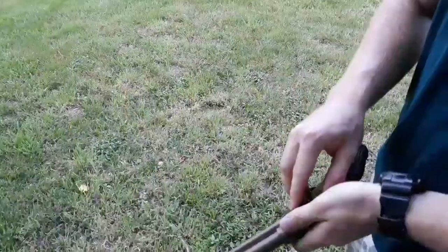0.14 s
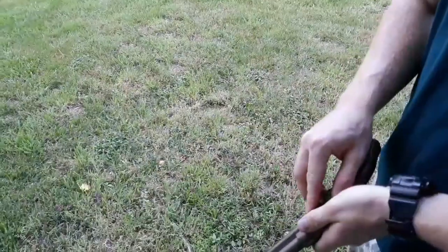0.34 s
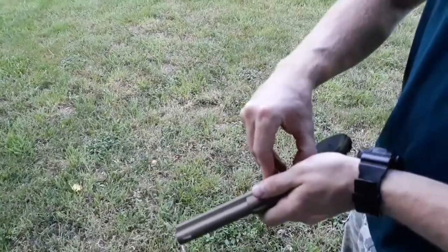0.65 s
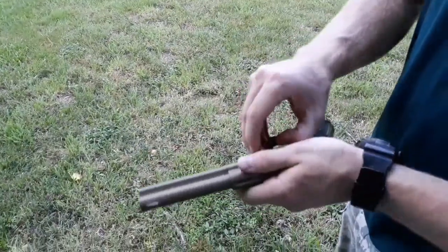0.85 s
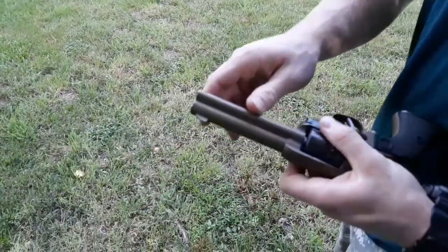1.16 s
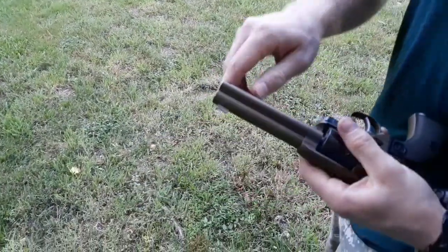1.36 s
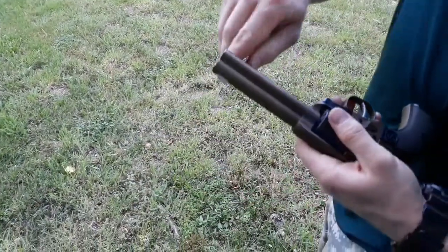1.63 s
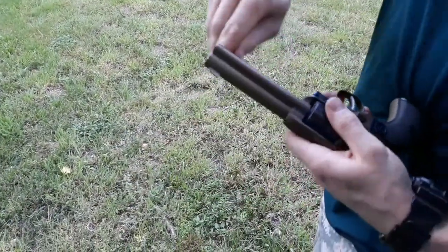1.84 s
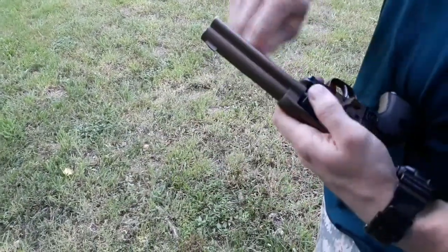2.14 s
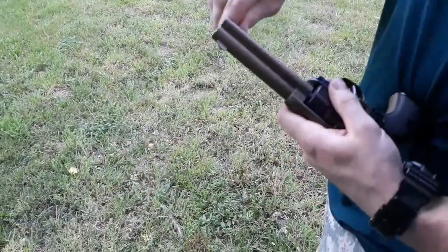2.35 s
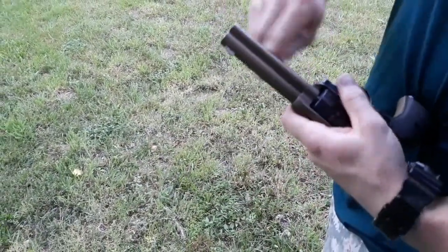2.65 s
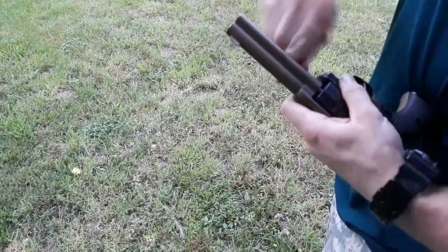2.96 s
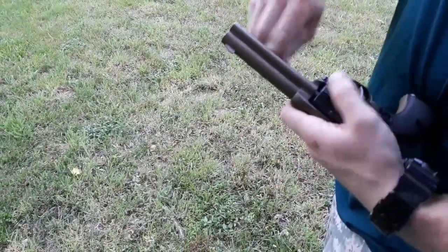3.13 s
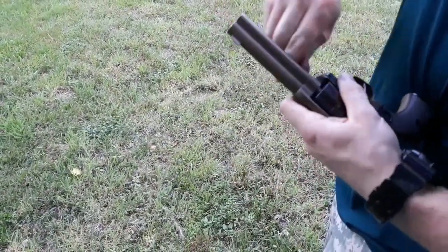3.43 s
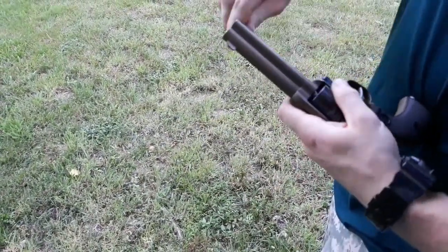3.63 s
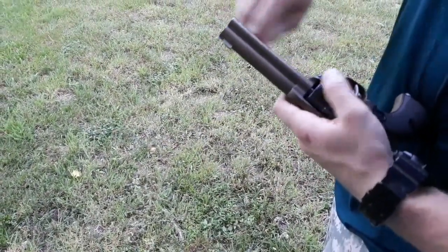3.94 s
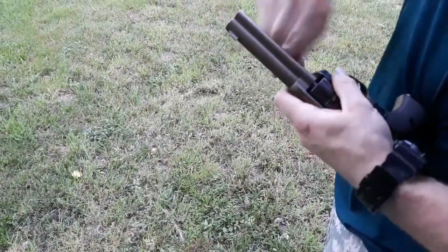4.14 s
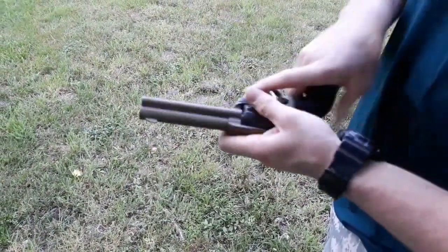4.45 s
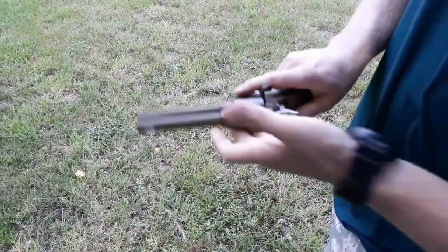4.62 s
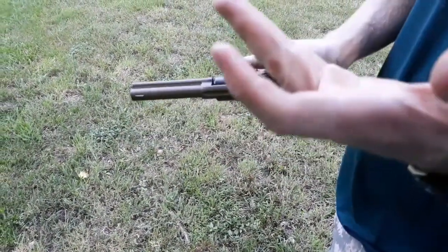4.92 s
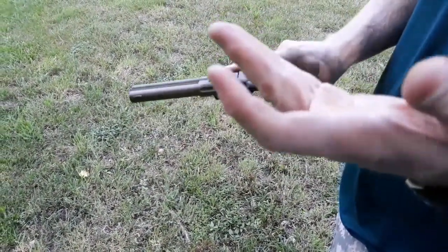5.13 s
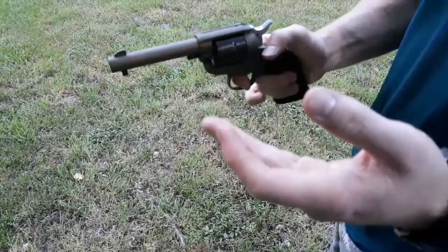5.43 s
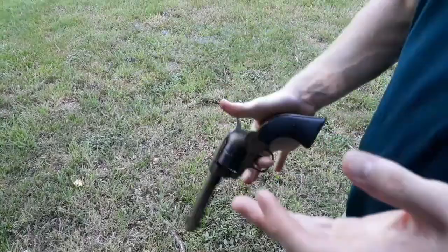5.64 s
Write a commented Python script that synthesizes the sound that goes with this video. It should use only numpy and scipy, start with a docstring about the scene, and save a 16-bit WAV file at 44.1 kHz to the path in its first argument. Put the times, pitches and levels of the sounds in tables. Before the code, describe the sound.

Outdoors on a lawn, a close stereo microphone catches a revolver being handled. A gate clicks open, a small ringing knock follows, then a spring-loaded rod repeatedly scrapes, squeaks and snaps back. Light cylinder taps lead to a hard closing snap, then faint touches. A bird whistles now and then over leafy hiss and low rumble.

```python
"""A steel revolver is emptied by hand on a lawn, close to a small two-port microphone: impulses and
friction grains excite damped steel modes as the sprung ejector rod scrapes and snaps home; gate,
cylinder and cases click in modes of their own, and the spring squeaks as gliding narrow-band noise.
A songbird whistles in the trees (gliding sine) over hiss and rumble (coloured noise), faint even ticks
(struck resonance), dull thuds (damped swings) and a wooden clatter further off (resonant noise)."""
import sys
import numpy as np
from scipy import signal
from scipy.fft import rfft, irfft, next_fast_len
from scipy.io import wavfile
from scipy.ndimage import uniform_filter1d, minimum_filter1d

SR = 44100
rng = np.random.default_rng(int(sys.argv[2]) if len(sys.argv) > 2 else 0)


def level_to_linear(level):
    """Convert decibel levels to linear amplitude factors, elementwise."""
    exponent = np.asarray(level, float) / 20
    return 10 ** exponent


def transcribe(u):
    """Save the signal u as a 16-bit wav file named by the first command-line argument.

    u: samples, shape (n,) or (channels, n), limited to [-1, 1]; the rate is SR.
    q: integer samples, one column per channel.
    """
    v = np.clip(np.atleast_2d(u).T, -1, 1)
    q = np.round(v * 32767).astype(np.int16)
    wavfile.write(sys.argv[1], SR, q)


N = 254935  # samples


def rms_one(x):
    """Normalisation: each channel to unit rms."""
    return x / np.sqrt(np.mean(x ** 2, axis=-1, keepdims=True) + 1e-20)


def in_time(tables, column, rest):
    """Linear interpolation of one column of several tables along time, at rest between them."""
    t, out = np.arange(N) / SR, np.full(N, float(rest))
    for rows in map(np.array, tables):
        inside = (t >= rows[0, 0]) & (t <= rows[-1, 0])
        out[inside] = np.interp(t[inside], rows[:, 0], rows[:, column])
    return out


def colour(x, points, share=1):
    """Linear filtering by a magnitude response: (f/Hz, level/dB) points joined on a log axis."""
    size, (hz, db) = next_fast_len(N + 4096), np.transpose(points)
    log_hz = np.log(np.arange(size // 2 + 1) * SR / size + 1)
    response = level_to_linear(share * np.interp(log_hz, np.log(hz), db))
    return irfft(rfft(x, size) * response, size)[..., :N]


def ring(x, hz, t60):
    """Damped resonator: a unit click sets a sine of height 1 ringing."""
    r, w = level_to_linear(-60 / (t60 * SR)), 2 * np.pi * hz / SR
    return signal.lfilter([0, np.sin(w)], [1, -2 * r * np.cos(w), r * r], x + 1e-18)


def drift(rate_hz):
    """Low-passed Gaussian noise: slow chance with spread 1."""
    r = np.exp(-2 * np.pi * rate_hz / SR)
    return rms_one(signal.lfilter([1], [1, -2 * r, r * r], rng.standard_normal(N + SR))[SR:])


def pair(rows, alike):
    """Partial coherence: two channels from three draws, the first shared."""
    alike = np.clip(alike, 0, 1)
    return np.sqrt(alike) * rows[0] + np.sqrt(1 - alike) * rows[1:]


def span(start, stop, attack, release):
    """Envelope: progress 0-1 through a span, and a gain that fades in and decays after the stop."""
    t = np.arange(N) / SR
    fade_in = np.clip((t - start) / attack, 0, 1) ** 2
    decay = np.exp(-np.maximum(t - stop, 0) / release * 2)
    return np.clip((t - start) / (stop - start), 0, 1), fade_in * decay


def highpass(x, hz):
    """Second-order Butterworth high-pass: the bass falls away below hz."""
    return signal.sosfilt(signal.butter(2, hz, "high", fs=SR, output="sos"), x)


# outdoor floor over time, relative levels: [t/s, rumble level/dB, hiss level/dB]
FLOOR_LEVELS = [(0.0, -70.5, -58), (0.58, -67.5, -59.5), (0.64, -62, -56), (0.85, -65, -58.5),
                (1.19, -72, -58), (1.98, -72, -61), (2.46, -70, -57), (3.3, -70.5, -57.5),
                (3.91, -69.5, -54), (4.1, -72.5, -64.5), (4.25, -68, -57), (4.5, -72, -59.5),
                (5.49, -79, -65.5), (5.78, -76, -64)]
# spectral density of the floor at either port: [f/Hz, level/dB per Hz]
LEFT_FLOOR_COLOUR = [(25, -21), (70, 3.5), (145, -2.5), (300, -7.5), (600, -5.5), (1400, -12.5), (2400, -7),
                     (4600, -11), (7200, -11), (8600, -28), (11500, -20.5), (15200, -18.5), (16000, -34.5)]
RIGHT_FLOOR_COLOUR = [(25, -21.5), (70, 1.5), (140, -0.5), (270, -8.5), (620, -9.5), (1500, -10),
                      (2400, 0.5), (3100, -3), (4030, -0.5), (5700, -18.5), (6700, -30.5), (14400, -27),
                      (16000, -31)]


def floor():
    """Coloured noise: partly coherent, lumpy rumble; hiss of leaves and insects, own at each port."""
    def shaped(x, kind, hz):
        """Band splitting: one side of the split, rms 1 in the middle."""
        x = np.array([colour(x[0], LEFT_FLOOR_COLOUR), colour(x[1], RIGHT_FLOOR_COLOUR)])
        x = signal.sosfilt(signal.butter(2, hz, kind, fs=SR, output="sos"), x)
        return x / np.sqrt(np.mean(x.mean(0) ** 2))
    rumble = shaped(pair(rng.standard_normal((3, N)), 0.45), "low", 900)
    hiss = shaped(rng.standard_normal((2, N)), "high", 900)
    rumble_db = in_time([FLOOR_LEVELS], 1, -72.5) + 2.0 + 2.0 * drift(11)
    hiss_db = in_time([FLOOR_LEVELS], 2, -61.5) - 3.5 + 1.0 * drift(24)
    return rumble * level_to_linear(rumble_db) + hiss * level_to_linear(hiss_db)


def ticks():
    """Periodic impulses on one strongly damped resonance: faint high ticks, mostly on the left."""
    start_s, period_s = .074, .1024
    at = (np.arange(start_s, N / SR, period_s) * SR).astype(int)
    clicks = np.zeros(N)
    clicks[at] = level_to_linear(-44.5 + 1.6 * rng.standard_normal(len(at)))
    return ring(clicks, 6970, 0.00038) * level_to_linear([[0], [-14]])  # Hz, t60 in s


# envelope of the clatter: [t/s, level/dB]
CLATTER_LEVELS = [(.105, -57), (.115, -50), (.145, -40.5), (.18, -48.5), (.222, -49), (.23, -71)]
# broad resonances of the clatter: [f/Hz, width/Hz, level/dB]
CLATTER_RESONANCES = [(515, 620, -33), (1008, 150, 9.5), (1375, 430, 6), (2320, 430, 4), (2960, 100, 0.5),
                      (3430, 390, -42)]
# impulse behind its crack: [t/s, level before softening and ringing/dB]
CRACK_IMPULSE = [(0.14, -24)]


def clatter():
    """Resonant filtering: lumpy noise in a few broad, wooden resonances, with one sharp crack."""
    drive = pair(rng.standard_normal((3, N)), 0.64) * level_to_linear(1.0 * drift(80))
    body = 0
    for hz, width, db in CLATTER_RESONANCES:
        t60 = np.log(1000) / np.pi / width  # a wider resonance dies sooner
        body = body + level_to_linear(db) * np.sqrt(width) * ring(drive, hz, t60)
    body = highpass(rms_one(body), 400)
    click = np.zeros(N)
    click[round(CRACK_IMPULSE[0][0] * SR)] = level_to_linear(CRACK_IMPULSE[0][1])
    click = signal.lfilter([.3], [1, -.7], click)  # a soft contact
    crack = 1.75 * ring(click, 2280, 0.0029) + 1.0 * ring(click, 4020, 0.0066)
    return body * level_to_linear(in_time([CLATTER_LEVELS], 1, -120)) + crack * level_to_linear([[-7], [4]])


# dull thuds carried by the ground or the hand:
# [t/s, level before onset and damping/dB, settled f/Hz, t60/s, left-right level/dB]
THUD_SWINGS = [(0.141, -45, 87, 0.13, -27), (4.348, -30, 123.3, 0.021, -33.5),
               (5.113, -27.5, 91, 0.027, 19), (5.183, -40, 500, 0.027, 3), (5.597, -48.5, 63.3, 0.066, 20)]


def thuds():
    """Damped oscillation: a low swing whose pitch sags as the contact spreads."""
    out = np.zeros((2, N))
    for s, db, hz, t60, pan_db in THUD_SWINGS:
        t = np.maximum(np.arange(N) / SR - s, 0)
        cycles = hz * (t + 0.0084 * (1 - np.exp(-t / 0.0016)))
        onset = np.minimum(t / 0.013, 1)
        swing = level_to_linear(db - 60 * t / t60) * np.sin(2 * np.pi * cycles) * onset
        out += swing * level_to_linear([[pan_db / 2], [-pan_db / 2]])
    return highpass(out, 50)


# bird whistles, one table each: [t/s, f/Hz, mean level before flutter/dB]
WHISTLES = [
    [(0.225, 3510, -51), (0.245, 3944, -61), (0.261, 2897, -59), (0.287, 2704, -64), (0.3, 2670, -67)],
    [(0.315, 2760, -60), (0.335, 3154, -47), (0.371, 3004, -51), (0.397, 2784, -61), (0.42, 2488, -61)],
    [(1.135, 4135, -74), (1.149, 3861, -56), (1.162, 3728, -70)],
    [(1.34, 2890, -84), (1.354, 2719, -58), (1.384, 2460, -78), (1.39, 2545, -68)],
    [(1.43, 2140, -61), (1.448, 2800, -60), (1.456, 3420, -54), (1.468, 3564, -50), (1.479, 3630, -51)],
    [(1.481, 3850, -62), (1.487, 4130, -56), (1.492, 4120, -58)],
    [(1.493, 3320, -59), (1.502, 3050, -56), (1.518, 2680, -62)],
    [(2.38, 3000, -72), (2.408, 3075, -57), (2.42, 3460, -56), (2.466, 3360, -71), (2.49, 3350, -49)],
    [(3.53, 2510, -85), (3.55, 2739, -56), (3.572, 3430, -61), (3.582, 3370, -62), (3.62, 3250, -69)],
    [(4.58, 2690, -80.5), (4.616, 2570, -86), (4.654, 3430, -52), (4.688, 2750, -64), (4.72, 3060, -72)],
    [(5.68, 3200, -62.5), (5.696, 3684, -67), (5.716, 4070, -66.5), (5.75, 2970, -71), (5.78, 3307, -76.5)],
]


def bird():
    """Frequency modulation: a near sine follows the gliding pitch, with soft edges."""
    level = level_to_linear(in_time(WHISTLES, 2, -120) + 2.0 * drift(50))
    level = uniform_filter1d(level, size=300)
    phase = 2 * np.pi * np.cumsum(in_time(WHISTLES, 1, 2800)) / SR
    return np.sqrt(2) * level * np.sin(phase)


# modes of the steel parts: [f/Hz, struck level/dB, scraped level/dB, t60/s]
STEEL_MODES = [(994, 1, -32, 0.022), (1480, 11, -20.5, 0.0034), (1884, 5.5, -19.5, 0.0028),
               (2291, 13, -6, 0.013), (2670, 8.5, -7.5, 0.0035), (3045, -8, -1, 0.013),
               (3300, 1.5, 0.5, 0.0069), (3950, -1, -5.5, 0.01), (4390, -2.5, -3.5, 0.015),
               (4862, -5, -3.5, 0.0084), (5405, -1, -11, 0.0027), (6350, 8.5, -10.5, 0.0038),
               (7050, 7.5, -9, 0.0042), (7564, 10.5, -14, 0.0015), (8610, -10, -11.5, 0.0016),
               (10360, 12, -6, 0.00076), (10860, 9, -10, 0.0044), (11860, 1.5, -22, 0.012),
               (12110, -4.5, -10.5, 0.0045), (12220, 11, 0.5, 0.0039), (13540, -1, -6.5, 0.0011),
               (15610, 17.5, 12.5, 0.013), (14820, 7.5, -1.5, 0.0056)]
# frequencies that part the modes into lowest, low, middle, high and topmost: [f/Hz]
MODE_GROUP_EDGES = [1700, 2800, 5500, 9000]


def steel(drives):
    """Modal superposition: each drive rings its own mode; small parts radiate no bass."""
    out = np.zeros((2, N))
    for k, (drive, (hz, _, _, t60)) in enumerate(zip(drives, STEEL_MODES)):
        out += (-1) ** k * ring(drive, hz, t60)
    return highpass(out, 550)


# blows of steel on steel: [t/s, middle-mode level/dB,
# then against it: lowest-mode level/dB, low-mode level/dB, high-mode level/dB]
STEEL_BLOWS = [(.8732, -45.5, -17, -14, -18), (.9398, -18.5, -21, -8, -14.5), (1.0742, -54, 1, -12, -10),
               (1.1955, -42.5, -4.5, -8, -10), (1.2388, -30.5, -30, -13.5, -5.5),
               (1.2504, -44.5, -30, -6.5, 0.5), (1.5486, -44, -3, -5.5, -40), (1.6654, -55, 3, -10, -25),
               (1.7235, -26, -11, -7, -14.5), (1.9214, -43.5, -10.5, -12.5, -38),
               (1.9772, -55, -21, -20, -4), (2.023, -19, -55, -18.5, -13), (2.0334, -41, 4, -18, -11),
               (2.0676, -19, -28, 0, -17), (2.0832, -23, -15, -39, -8), (2.102, -34.5, -15, -32, -9),
               (2.2237, -52, -6, -22, -9), (2.2603, -30.5, -12, -12.5, -15), (2.3344, -18.5, -20, -18, -10),
               (2.3535, -51, -16, -4, -14), (2.4863, -43.5, -42, -50, -6), (2.51, -20.5, -16, -14.5, -9.5),
               (2.5462, -30, -9, -28, -5), (2.552, -18.5, -16, -13.5, -22), (2.5797, -21, -43, -2, -27),
               (2.597, -23, -18, -18.5, -11.5), (2.6094, -35.5, -11, -20, -8.5),
               (2.7157, -47.5, -35, -12, -6.5), (2.8457, -21, -27, -27, -11), (2.855, -55, -22, -9, 14),
               (2.97, -44, -32, -42, -5), (2.9854, -27, -15, -17, -7.5), (3.0096, -36.5, -3, -21, -9),
               (3.018, -18.5, -13, -18.5, -36), (3.0485, -23, -30, -3.5, -32),
               (3.068, -23, -20.5, -12, -16), (3.0873, -36.5, -14, -15, -6.5),
               (3.3249, -17.5, -51, -17, -17), (3.334, -33, -13.5, -20, -6), (3.3744, -45, -5, -28, -5.5),
               (3.471, -24.5, -39, -3, -28.5), (3.486, -21.5, -36, -15, -15.5),
               (3.4962, -29, -12.5, -11, -15.5), (3.7399, -14.5, -37, -21, -13),
               (3.752, -36, -6.5, -20, -5), (3.8085, -28.5, -31, -17.5, -8),
               (3.8642, -29, -37.5, -12.5, -11), (3.8762, -13, -40, -12.5, -39.5),
               (3.8945, -20, -20, -15.5, -10), (3.9024, -29.5, -6, -14, -10), (3.993, -47, -22, -24, -10),
               (4.1093, -17.5, -23, -23, -15), (4.121, -44, -1, -12, -4.5), (4.15, -38.5, -9, -25, -10.5),
               (4.1682, -37, 3, -28, -15), (4.2685, -27.5, -11, -15.5, -24), (4.341, -41.5, -2, -18, -7.5),
               (4.4062, -11.5, -17.5, -33, -9), (4.4992, -52, -30, -22.5, -8), (4.6699, -51.5, -4, -6, -32),
               (4.702, -44.5, -16, -21, -13.5), (4.7396, -52, 3.5, -19, -23), (4.755, -38.5, 3, -14, -23),
               (4.7706, -21.5, -20, -35, -51), (4.7877, -34, -7.5, -21, -22), (4.8449, -44.5, -5, -21, -40),
               (4.9055, -56, 7.5, -9.5, -31), (5.011, -54, 4.5, 1, -40.5), (5.1121, -11, -13.5, -18.5, -5),
               (5.2628, -54.5, -20, -7.5, -11), (5.426, -64.5, -28, 7, -16), (5.5333, -55, -20.5, -3, -26),
               (5.5475, -50.5, -24, -6, -28), (5.5766, -57.5, 3, -0.5, -21),
               (5.5974, -50.5, -29, -10, -13.5), (5.6117, -54.5, 1.5, -4, -12),
               (5.6624, -62.5, -3, 7.5, -14), (5.7588, -52.5, -42, -34, -15)]
# mean strength of a finger touch: the four level/dB columns of a blow
TOUCH_LEVELS = [-68.5, -17.5, -4, -27]


def blows():
    """Impulsive excitation: a hard contact and its brief chatter; faint touches come by chance."""
    touches, top_db = 14, -7  # count; topmost modes against the high ones
    length = 600  # samples of contact
    touch_s = rng.uniform(0, N - length, touches) / SR
    touch_rows = np.c_[touch_s, TOUCH_LEVELS + rng.normal(0, 3, (touches, 4))]
    s, db, lowest_db, low_db, high_db = np.r_[STEEL_BLOWS, touch_rows].T
    group_db = [lowest_db, low_db, 0 * db, high_db, high_db + top_db]
    at = (s * SR).astype(int)[:, None] + np.arange(length)
    rattle = pair(rng.choice([-1., 1.], (len(s), 3, length)).swapaxes(0, 1), 0.32)
    # light touches fumble longer and land less cleanly
    soft = np.clip((-22 - db) / 25, 0, 1)[:, None]
    dying = 0.14 * np.exp(-np.arange(length) / ((0.0021 + 0.0028 * soft) * SR))
    contact = (np.arange(length) == 0) * (1 - 0.49 * soft)
    spread_db = rng.normal(0, 1, (len(s), len(STEEL_MODES)))  # no two blows land alike

    def drives():
        """Modal participation: each mode feels its own chatter, low ones less."""
        for k, (hz, struck_db, _, _) in enumerate(STEEL_MODES):
            group = np.searchsorted(MODE_GROUP_EDGES, hz)
            chatter = contact + min(hz / 5000, 1) * dying * np.roll(rattle, 7 * k, axis=2)
            drive = np.zeros((2, N))
            # where contacts overlap, the one listed later takes over
            drive[:, at] = chatter * level_to_linear(db + struck_db + spread_db[:, k] + group_db[group])[:, None]
            yield drive
    return steel(drives())


# the loading gate snaps open and shut: [t/s, impulse level/dB]
GATE_IMPULSES = [(.9398, -17.5), (5.1113, -16.5)]
# modes of the gate: [f/Hz, level/dB, t60/s]
GATE_MODES = [(708, -23.5, .012), (1176, -15.5, 0.0086), (1510, -10.5, 0.011), (2680, 0.5, 0.013),
              (3400, 0.5, 0.012), (4200, -1, 0.0094), (4510, -7, 0.0099), (5030, 0.5, .008),
              (5564, -1, 0.0073), (6840, -9.5, 0.0058), (11580, -12.5, 0.0087)]


def gate():
    """Repeated impact: each snap is a run of four equal, quick bounces on the latch spring."""
    bounce_s = .0011
    clicks = np.zeros(N)
    for s, db in GATE_IMPULSES:
        for k in range(4):
            clicks[round((s + k * bounce_s * rng.uniform(.8, 1.2)) * SR)] = level_to_linear(db)
    out = 0
    for k, (hz, db, t60) in enumerate(GATE_MODES):
        out = out + (-1) ** k * level_to_linear(db) * ring(clicks, hz, t60)
    return out


def thin_modes(knocks, modes):
    """Impulse response: clean clicks into thin ringing modes."""
    clicks = np.zeros(N)
    for s, db in knocks:
        clicks[round(s * SR)] = level_to_linear(db)
    rings = sum(level_to_linear(db) * ring(clicks, hz, t60) for hz, db, t60 in modes)
    return signal.sosfilt(signal.butter(2, [1500, 6500], "band", fs=SR, output="sos"), rings)


# an empty case knocks the frame: [t/s, impulse level/dB]
CASE_IMPULSES = [(1.24, -28.5), (1.25, -48)]
# modes of the case: [f/Hz, level/dB, t60/s]
CASE_MODES = [(2430, -15, 0.086), (4770, 3.5, 0.037), (5150, -25, 0.29)]


def case():
    """Free vibration: the empty case rings on after its knocks."""
    return thin_modes(CASE_IMPULSES, CASE_MODES)


# rod strokes: [start t/s, stop t/s, scrape level/dB, high-mode squeal level/dB,
# swell from start to stop level/dB]
ROD_STROKES = [(1.688, 1.724, -50.5, -47, 13), (2.027, 2.079, -46, -33.5, 3),
               (2.223, 2.342, -47, -39.5, -1.5), (2.483, 2.501, -44, -41, 20),
               (2.537, 2.594, -44.5, -34, 4), (2.727, 2.85, -51.5, -44.5, -1.5),
               (3.001, 3.07, -43, -38.5, 0.5), (3.205, 3.339, -49.5, -46, 4),
               (3.395, 3.487, -43.5, -35, 19), (3.623, 3.745, -45, -39, 13.5),
               (3.807, 3.901, -50, -39.5, 2), (4.004, 4.118, -49, -42, -5.5),
               (4.163, 4.262, -47.5, -37, 12), (4.345, 4.419, -43, -37, 1)]


def rod():
    """Stick-slip friction: the rod catches on its spring in dense uneven slips that ring the steel."""
    scrape_gain, squeal_gain = np.zeros((2, N))
    # both gains follow the speed of the rod through each stroke
    for start, stop, scrape_db, squeal_db, swell_db in ROD_STROKES:
        done, gain = span(start, stop, 0.022, 0.014)  # attack, release in s
        speed = gain * level_to_linear(swell_db * (done - 1))
        scrape_gain += speed * level_to_linear(scrape_db)
        squeal_gain += speed * level_to_linear(squeal_db)
    slip_db = 1.8 * np.minimum(rng.exponential(1, N), 5) + 1.88 * drift(43)
    slips = (rng.random(N) < 7000.0 / SR) * level_to_linear(slip_db)  # 7000 a second
    grains = rms_one(pair(rng.standard_normal((3, N)), 0.022) * slips)
    scrape, squeal = grains * scrape_gain, grains * squeal_gain
    # as the contact point travels it favours now one mode, now another
    travel = [level_to_linear(4.6 * drift(10.2)) for _ in range(5)]

    def drives():
        """Modal participation: squeal drives the high and topmost modes, scrape the rest."""
        for k, (hz, _, scraped_db, t60) in enumerate(STEEL_MODES):
            source = squeal if np.searchsorted(MODE_GROUP_EDGES, hz) > 2 else scrape
            # the root evens out the longer build-up of slowly dying modes
            yield source * travel[k % 5] * level_to_linear(scraped_db) / np.sqrt(t60 * SR / 28)
    return steel(drives())


# the spring squeaks as it is squeezed: [start t/s, stop t/s, first f/Hz, last f/Hz, level/dB]
SPRING_SQUEAKS = [(1.692, 1.733, 4050, 3830, -56), (2.012, 2.069, 3900, 3770, -43),
                  (2.228, 2.336, 3950, 3960, -39.5), (2.751, 2.84, 4040, 3590, -46),
                  (3.206, 3.314, 4290, 3940, -43), (3.388, 3.461, 4120, 4020, -41.5),
                  (3.627, 3.735, 4200, 4010, -45), (3.811, 3.865, 4120, 4040, -36.5),
                  (4.009, 4.105, 4100, 3950, -37), (4.183, 4.265, 4080, 4160, -43),
                  (4.351, 4.394, 4200, 4274, -35.5)]


def squeak():
    """Narrow-band noise: slow noise modulates a gliding carrier, partly its own at each port."""
    hz, level = np.full(N, 4000.), np.zeros(N)
    for start, stop, first_hz, last_hz, db in SPRING_SQUEAKS:
        done, gain = span(start, stop, .025, .004)
        hz = np.where(done > 0, first_hz + (last_hz - first_hz) * done, hz)
        level += level_to_linear(db) * gain
    phase = 2 * np.pi * np.cumsum(hz) / SR
    slow = np.array([drift(130) for _ in range(6)])  # Hz, sets the bandwidth
    band = slow[:3] * np.cos(phase) + slow[3:] * np.sin(phase)
    return pair(band, 0.94) * level * level_to_linear(2.0 * drift(6.7))


# taps on the freed cylinder: [t/s, impulse level/dB]
CYLINDER_IMPULSES = [(4.6699, -50), (4.7396, -46), (4.755, -44), (4.7706, -39), (4.7877, -37.5),
                     (4.8449, -46.5), (4.9055, -55), (5.011, -51)]
# modes of the cylinder: [f/Hz, level/dB, t60/s]
CYLINDER_MODES = [(2070, -4, .04), (2644, -6, .03), (3180, 2, 0.068), (4460, -16, 0.038)]


def cylinder():
    """Free vibration: the freed cylinder is tapped and rings."""
    return thin_modes(CYLINDER_IMPULSES, CYLINDER_MODES)


def yard(x, t60, db, dull):
    """Diffuse scattering from ground, body and trees: a dying noise tail of its own for each port."""
    t = np.arange(SR // 2) / SR
    tail = rng.standard_normal((2, len(t))) * level_to_linear(-60 * t / t60) * np.minimum(t / 0.002, 1)
    tail = signal.lfilter([1], [1, -np.clip(dull, 0, .9)], tail)
    tail = tail / np.sqrt(np.sum(tail ** 2) / 2)
    return x + level_to_linear(db) * signal.fftconvolve(x, tail, axes=1)[:, :N]


# response of the ports to a near source, before each takes its share: [f/Hz, left-right level/dB]
PORT_DIFFERENCE = [(300, 8.5), (1000, -5), (1700, -5.5), (2300, -12), (3100, -14.5), (4200, -20),
                   (5000, -9.5), (5800, -2), (7000, 18.5), (8200, 13.5), (9600, -1.5), (11000, 11.5),
                   (12500, 17.5), (15500, 16.5)]


def two_ports(gun):
    """Interaural-like lag and colour: the gun reaches the right port first; each port colours it."""
    left = np.roll(gun[0], 6)  # samples late
    return np.array([colour(left, PORT_DIFFERENCE, 0.46), colour(gun[1], PORT_DIFFERENCE, -0.39)])


def scene():
    """Linear superposition: the near gun, the bird in the trees and the surroundings add up."""
    gun = blows() + gate() + case() + rod() + squeak() + cylinder()
    gun = two_ports(yard(gun, 0.14, -17.5, 0.079))
    song = yard(bird() * level_to_linear([[-4], [3]]), 0.52, 0.0, 0)
    return floor() + ticks() + clatter() + thuds() + song + gun


def band_limit(x):
    """A steep low-pass at the top of the band."""
    return signal.sosfilt(signal.butter(12, 16780, fs=SR, output="sos"), x)


def record(dry):
    """Peak limiting and low-pass filtering: the hardest blows are held down, then the top is cut."""
    limit = .9  # full scale = 1
    gain = minimum_filter1d(limit / np.maximum(np.abs(dry).max(axis=0), limit), size=89)
    limited = dry * uniform_filter1d(gain, size=45)
    top_cut = signal.cheby2(10, 50, 15820, fs=SR, output="sos")  # order, dB down, from Hz
    return band_limit(signal.sosfilt(top_cut, limited))


dry = scene()
out = record(dry)
transcribe(out)
```